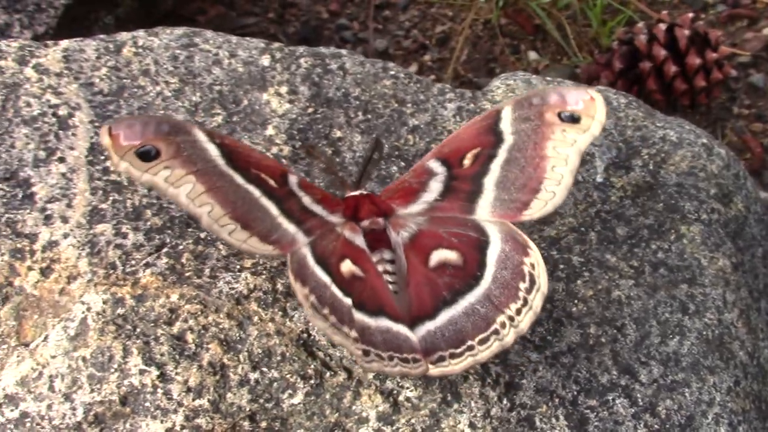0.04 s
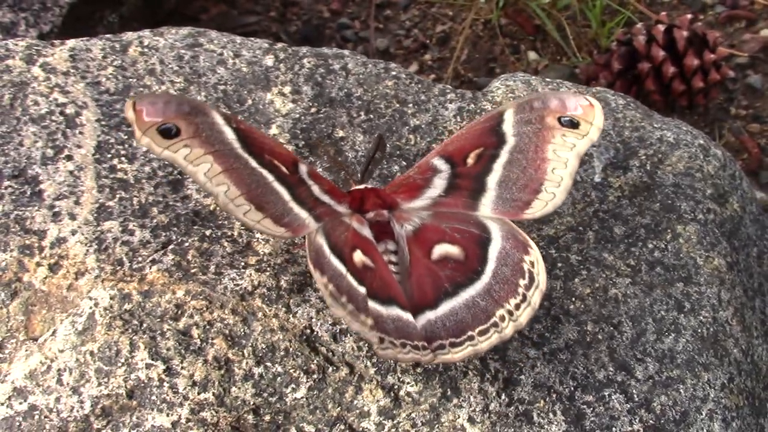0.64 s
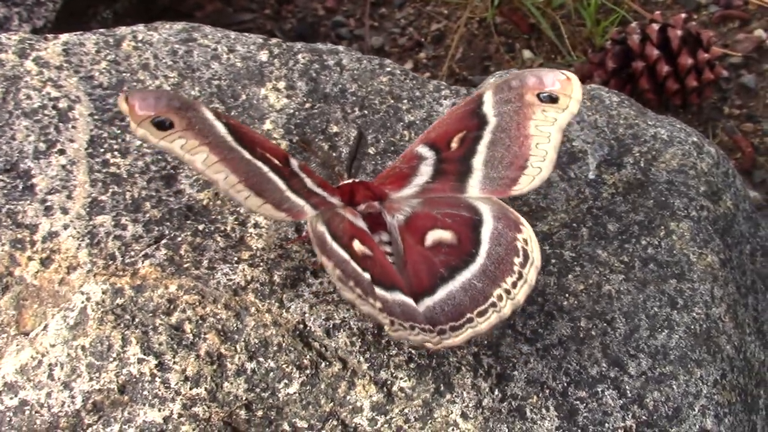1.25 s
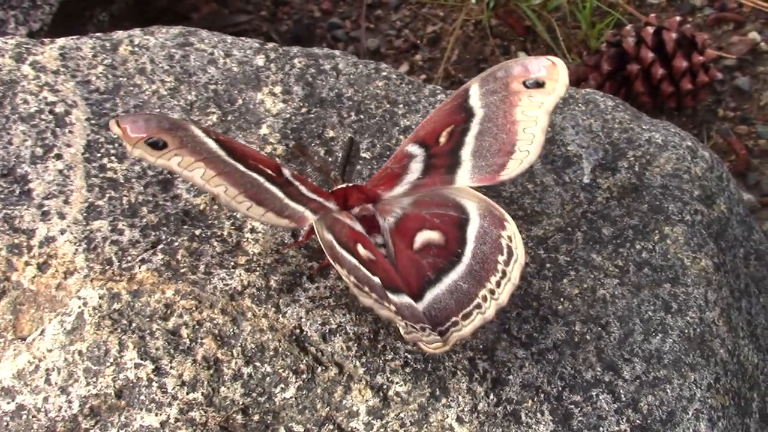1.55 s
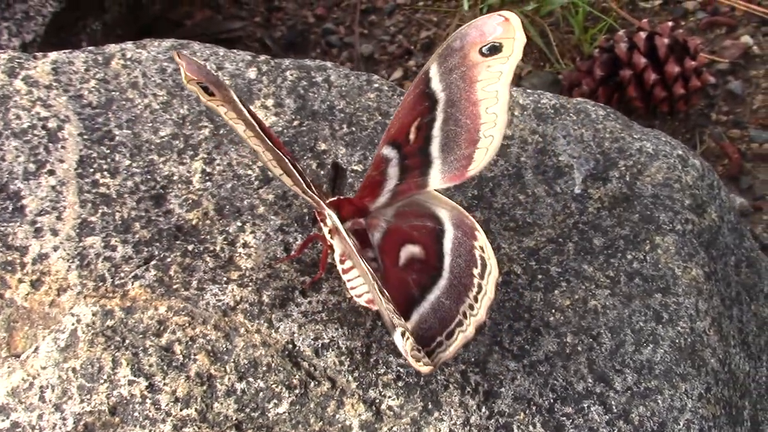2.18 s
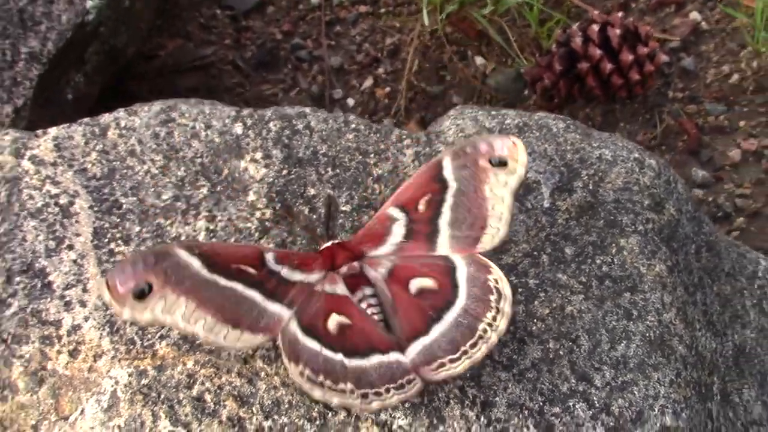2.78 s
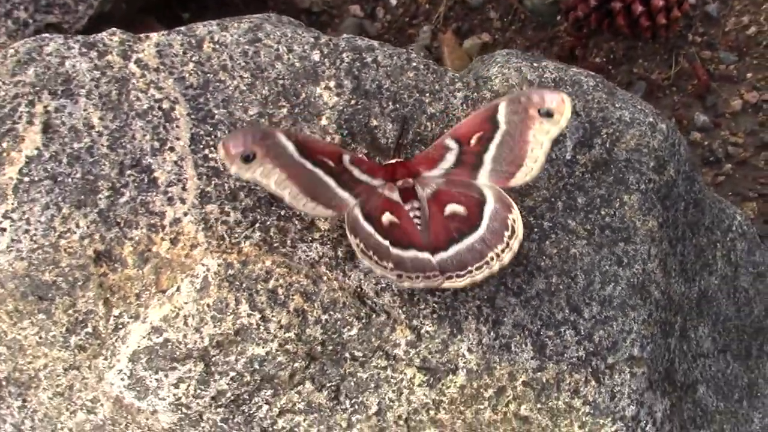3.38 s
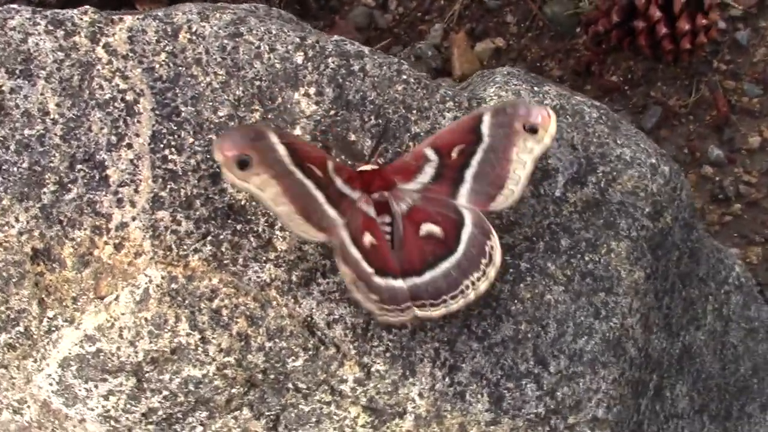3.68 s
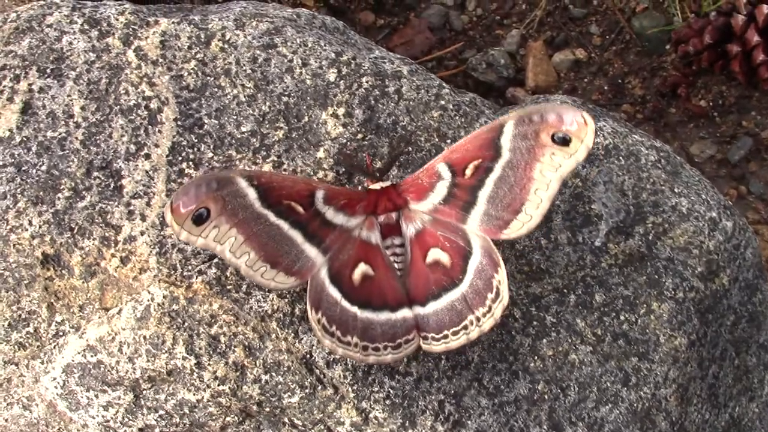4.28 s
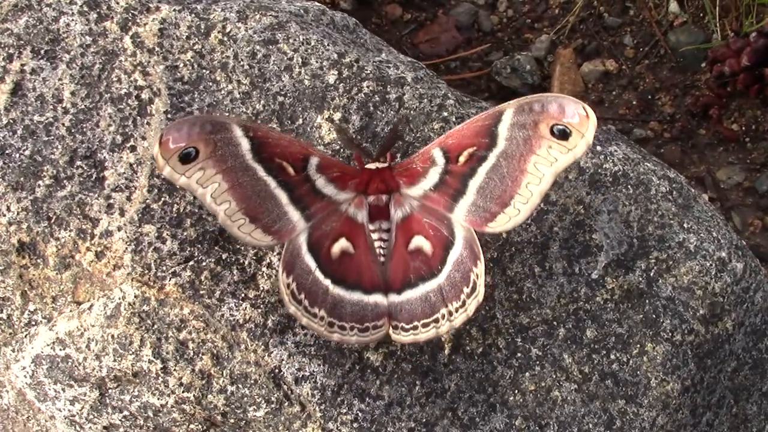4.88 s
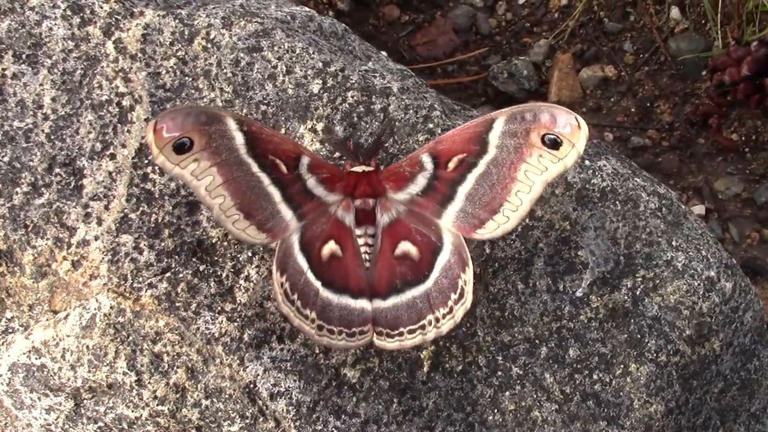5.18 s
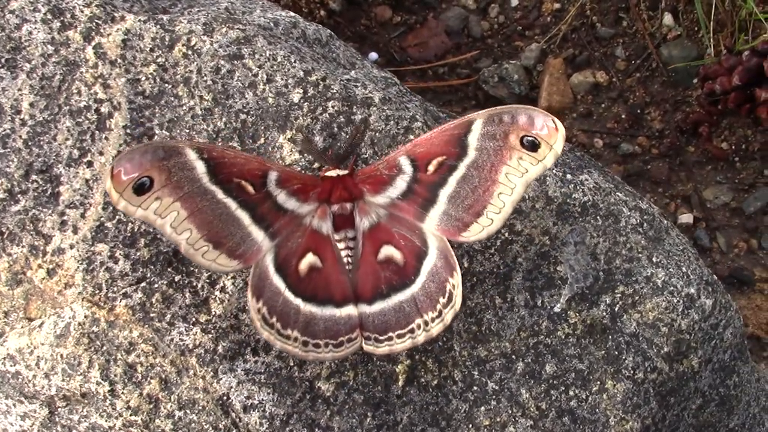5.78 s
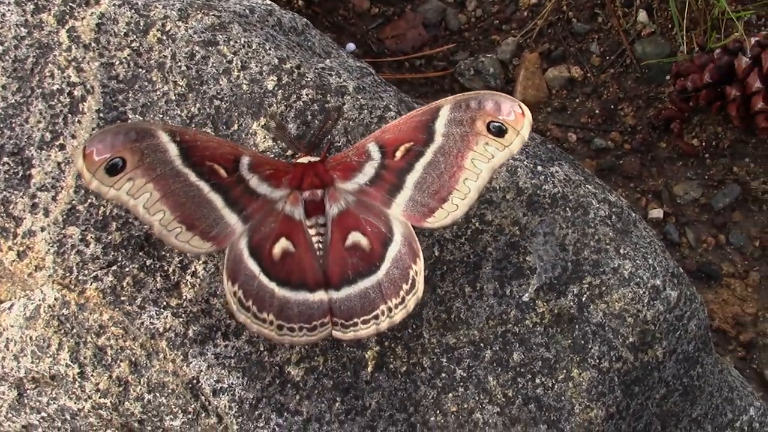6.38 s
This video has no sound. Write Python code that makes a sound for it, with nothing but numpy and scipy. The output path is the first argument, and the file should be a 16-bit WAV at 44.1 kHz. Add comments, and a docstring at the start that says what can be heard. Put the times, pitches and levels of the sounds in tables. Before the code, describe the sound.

A camera purrs and ticks in quiet open air, with close handling clicks and rubs, a sleeve rustle and faint distant bird notes.

```python
"""Quiet open air, and right at the stereo microphone the purr, hum and tick of a camera's drive.
The camera is hand-held over a silent moth on a rock; far off, a bird whistles a few faint notes.
As the camera is shifted, a sleeve rustles close by. Fingers click and thud on the case, ringing
and rocking it, and their skin rubs and creaks in tiny slips, right beside the microphone."""
import sys
import numpy as np
from scipy import signal
from scipy.fft import rfft, irfft
from scipy.io import wavfile

SR = 44100
rng = np.random.default_rng(int(sys.argv[2]) if len(sys.argv) > 2 else 0)


def dump(signal):
    """Clip the signal to [-1, 1] and save it as 16-bit WAV at the path in sys.argv[1]."""
    limited = np.clip(np.atleast_2d(signal).T, -1, 1)
    pcm = np.round(limited * 32767).astype(np.int16)
    wavfile.write(sys.argv[1], SR, pcm)


N = 293265
TIME = np.arange(N) / SR

# open air around the rock: (frequency [Hz], relative density [dB])
AIR_SPECTRUM = [(25, -32), (50, -22.5), (80, -13), (115, -4), (200, -8.5), (300, -5), (400, -8.5),
                (560, -10), (690, -15), (770, -17), (1230, -21.5), (2280, -25), (5000, -31.5),
                (11000, -39.5), (16000, -48)]
# how alike the two microphone channels are: (frequency [Hz], likeness [0-1])
MIC_LIKENESS = [(30, 0.6), (100, 1), (400, 0.89), (1500, 0.62), (5000, 0.84), (14000, 0.99)]
# purr of the drive: (frequency [Hz], relative density [dB])
PURR_SPECTRUM = [(40, -28), (80, -19), (115, -10), (220, 9), (320, -3), (450, -11.5), (550, -8),
                 (690, -7.5), (800, -20), (2500, -37)]
# hum of its motor: (multiple of the turning rate, rms level [dB])
HUM_PARTIALS = [(10, -56), (15, -60)]
# the case as the drive's bump rocks it: (frequency [Hz], level [dB], t60 [s])
ROCKING_MODES = [(130, -6, 0.036), (200, 2.5, 0.017)]
# how hard the drive bumps, swelling and easing: (time [s], level [dB])
BUMP_LEVELS = [(.45, -39), (.75, -33), (1.55, -37.5), (1.85, -32.5), (3.1, -37.5), (3.8, -33.5),
               (4.6, -33.5), (5.2, -36.5), (5.65, -47), (6.25, -33), (6.65, -38)]
# one cycle of the ticking mechanism: (time from the main tick [s], level [dB])
TICK_PATTERN = [(-.0052, -7.5), (.0004, 1), (.0044, -5.5)]
# ring of one tick: (frequency [Hz], level [dB], t60 [s])
TICK_RING = [(1660, -72.5, 0.058), (2044, -54.5, 0.017), (2330, -62.5, 0.012)]
# notes of the far bird: (middle time [s], top pitch [Hz])
BIRD_NOTES = [(1.723, 2350), (1.813, 2320), (1.967, 2420), (2.056, 2330), (2.305, 2370), (2.471, 2480),
              (2.56, 2360), (2.803, 2310)]
# rustling cloth: (frequency [Hz], relative density [dB])
SLEEVE_SPECTRUM = [(300, -25), (800, 2.5), (1700, 4), (3000, -1), (5800, -2.5), (9000, -9), (13000, -16),
                   (16000, -20)]
# a nail or an edge catches on the case:
# (time [s], crack level [dB], ring against crack [dB], crack cut-off [Hz], left over right [dB])
CASE_CLICKS = [(2.4474, -43.5, 1, 6000, 0), (2.5925, -42, 2, 8700, -0.5), (2.7152, -20, 3.5, 12200, 7),
               (2.7169, -16.5, 2.5, 6000, -2), (2.726, -25, -5, 8900, -6), (3.154, -33, -17, 6000, 2),
               (3.1796, -19, -20, 15800, -1), (3.218, -20, -30, 9200, -2), (3.2192, -16, -39, 11900, 1.5),
               (3.3480, -26.5, -20, 2000, -3), (3.5456, -33, -25, 8000, -1), (3.5717, -33.5, -12, 2940, -1),
               (3.703, -37, -25, 11800, 2), (3.9946, -36, -21, 2470, 1), (5.8320, -29, -15, 2900, 3)]
# the struck case: (frequency [Hz], level [dB], t60 [s])
CASE_RING = [(1350, -25, 0.015), (1870, -41, .014), (2240, 0.5, 0.013), (2890, -14, 0.019),
             (4070, -21, 0.027), (4931, -20, 0.0057)]
# twisting modes of the case: (frequency [Hz], level [dB], t60 [s])
CASE_TWIST = [(2220, -6, 0.016), (2870, -13, .012)]
# a fingertip presses on the case: (time [s], level [dB], left over right [dB])
FINGER_PRESSES = [(2.7247, -17, -13), (2.7446, -23, 1.5), (3.3497, -31, 4), (3.4702, -16, 0.5),
                  (3.4810, -26.5, -0.5), (3.501, -29.5, -1), (3.5163, -25, 0.5), (3.5660, -29.5, 0),
                  (4.1295, -35, -0.5), (5.8333, -29.5, 2)]
# first a brief rush of noise swelling into the loud click; in later rows a finger slides and lets go:
# (start [s], end [s], attack [s], final level [dB], growth [dB], chatter against friction [dB])
RUSH_AND_SLIDES = [(2.699, 2.711, .003, -40, 18, -7), (2.829, 3.039, 0.092, -46.5, 3.5, -17),
                   (3.114, 3.221, 0.0026, -36.5, 10, -8), (3.488, 3.595, 0.013, -51, -1, -8),
                   (3.686, 3.704, .003, -56.5, -6, -15)]
# skin sliding on the case: (frequency [Hz], relative density [dB])
FRICTION_SPECTRUM = [(150, -7), (350, -2), (650, -1.5), (1050, -8), (1500, -5), (2600, -7.5), (4500, -9),
                     (6500, -11.5), (8500, -23), (11000, -23), (16000, -52)]
# its bright grit under hard pressure: (frequency [Hz], relative density [dB])
GRIT_SPECTRUM = [(2000, -32), (5200, -8), (6300, 0), (7400, -1), (9000, 5), (11000, -12), (12500, -1),
                 (14500, -5), (16000, -2)]
# the grip sticks and slips: (start [s], length [s], level [dB], pitch [Hz])
GRIP_CREAKS = [(2.7416, 0.0027, -34, 1900), (2.747, .005, -37.5, 2140), (3.19, 0.0148, -32.5, 1557),
               (3.346, 0.0055, -38, 1904), (3.692, .014, -55.5, 4510), (5.829, 0.0061, -36.5, 2440),
               (6.073, 0.011, -45.5, 3620)]


def from_db(db):
    """Decibels to gain."""
    return 10 ** (np.asarray(db) / 20)


def rms_one(x):
    """Scale to unit power."""
    return x / np.sqrt(np.mean(x ** 2) + 1e-20)


def at_hz(points, hz):
    """Join the rows by straight lines on a log-frequency axis."""
    known_hz, values = np.transpose(points)
    return np.interp(np.log(hz + 1e-9), np.log(known_hz), values)


def colour(x, spectrum):
    """Give x a spectrum; rms 1."""
    gain = from_db(at_hz(spectrum, np.fft.rfftfreq(N, 1 / SR)))
    return rms_one(irfft(rfft(x) * gain, N))


def waver(hz):
    """Random drift, mostly slower than hz; rms 1."""
    return colour(rng.standard_normal(N), [(hz, 0), (10 * hz, -60), (100 * hz, -120)])


def stereo_noise(spectrum):
    """Noise as two close microphones hear it; rms 1."""
    mid, side = rfft(rng.standard_normal((2, N)))
    alike = at_hz(MIC_LIKENESS, np.fft.rfftfreq(N, 1 / SR))
    pair = np.sqrt(1 + alike) * mid + np.sqrt(1 - alike) * side * [[1], [-1]]
    return colour(irfft(pair, N), spectrum)


def cut(x, hz, kind, order=2):
    """Butterworth filter."""
    return signal.sosfilt(signal.butter(order, hz, kind, fs=SR, output="sos"), x)


def ring(modes, t):
    """Damped sines after one blow."""
    return sum(from_db(db - 60 * t / t60) * np.sin(2 * np.pi * hz * t) for hz, db, t60 in modes)


def add(out, s, sound, pan_db=0):
    """Mix a sound into both channels at time s."""
    start = int(np.clip(round(s * SR), 0, N))
    sides = from_db(np.array([[pan_db], [-pan_db]]) / 2)
    out[:, start:start + sound.shape[-1]] += rms_one(sides) * sound[..., :N - start]


def open_air(rms_db=-54):
    """A low, steady hush all around the microphone."""
    return from_db(rms_db) * stereo_noise(AIR_SPECTRUM)


def drive(turn_s=.08081, slowing_s_per_turn=1.34e-5, memory=0.86, purr_db=-58.7, waver_hz=4):
    """Each turn of the drive gives a bump and a rough purr; its motor hums on multiples of the turn."""
    out = np.zeros((2, N))
    count = np.arange(-1, TIME[-1] / turn_s + 1)
    bump_times = .0791 + turn_s * count + slowing_s_per_turn * count ** 2 / 2
    turns = np.interp(TIME, bump_times, count + 1)
    bump = -cut(ring(ROCKING_MODES, TIME[:SR // 10]), 520, "low")
    for s in bump_times[1:]:
        force_db = np.interp(s, *np.transpose(BUMP_LEVELS)) + rng.normal(0, .6)
        add(out, s, bump * from_db(force_db))
    # unevenness met on the way round, partly the same from turn to turn
    fresh = rng.standard_normal((len(count), 1024))
    track = signal.lfilter([1], [1, -memory], fresh, axis=0).ravel()
    track_turns = np.linspace(0, len(count), len(track), endpoint=False)
    purr = colour(np.interp(turns, track_turns, track), PURR_SPECTRUM)
    for multiple, db in HUM_PARTIALS:
        level = from_db(db + 2.5 * waver(waver_hz))
        cycles = multiple * turns + 0.15 * waver(waver_hz)
        out += level * np.sqrt(2) * np.sin(2 * np.pi * cycles)
    return out + from_db(purr_db) * purr


def ticking(first_s=.0425, rate_hz=14.985, jitter_s=0.00028, scatter_db=0.2):
    """A small mechanism inside the camera rings with three quick ticks each cycle."""
    out = np.zeros((2, N))
    tick = ring(TICK_RING, TIME[:SR // 20])
    for s in np.arange(first_s, TIME[-1], 1 / rate_hz):
        for delay, db in TICK_PATTERN:
            add(out, s + delay + rng.normal(0, jitter_s), tick * from_db(db + rng.normal(0, scatter_db)))
    return out


def far_bird(note_s=0.044, peak_db=-59, arch=0.052):
    """Thin whistled notes in the distance, each rising and falling a little."""
    out = np.zeros((2, N))
    position = np.linspace(-1, 1, int(note_s * SR))
    envelope = from_db(peak_db) * (1 - position ** 2)
    for middle, top_hz in BIRD_NOTES:
        phase = 2 * np.pi * np.cumsum(top_hz * (1 - arch * position ** 2)) / SR
        add(out, middle - note_s / 2, envelope * np.sin(phase))
    return out


def sleeve(start_s=1.963, stop_s=3.54, attack_s=.22, top_db=-54.5, rise_db_per_s=4, fall_db_per_s=21.5):
    """Cloth rustles near the microphone as the arm moves once, then settles."""
    onset = np.clip((TIME - start_s) / attack_s, 0, 1)
    below_db = np.maximum(rise_db_per_s * (stop_s - TIME), fall_db_per_s * (TIME - stop_s))
    return onset * from_db(top_db - below_db) * stereo_noise(SLEEVE_SPECTRUM)


def crack(top_hz, t60):
    """A dying burst of noise, duller for a softer contact; peak 1."""
    t = TIME[:SR // 10]
    burst = rng.standard_normal(len(t)) * from_db(-60 * t / t60)
    burst = cut(cut(burst, top_hz, "low", order=5), 180, "high")
    return burst / np.abs(burst).max()


def contacts(pat_db=-8, twist_per_db=0.1):
    """Soft pushes rock the camera with a thud and a pat of skin; sharp ones crack and ring its case."""
    out, t = np.zeros((2, N)), TIME[:SR // 10]
    thud = -ring([(235, 0, .012), (440, -5, .016), (850, -7, .007)], t)
    for s, db, pan_db in FINGER_PRESSES:
        pat = from_db(pat_db) * crack(top_hz=1850, t60=0.01)
        add(out, s, from_db(db) * (thud + pat), pan_db)
    # a small shell radiates little below its modes
    case, twist = (cut(ring(modes, t), 1430, "high") for modes in (CASE_RING, CASE_TWIST))
    for s, db, ring_db, top_hz, pan_db in CASE_CLICKS:
        add(out, s, from_db(db) * (crack(top_hz, t60=0.0062) + from_db(ring_db) * case), pan_db)
        # a touch off centre twists the case, moving the two microphones against each other
        add(out, s, twist_per_db * pan_db * from_db(db + ring_db) * twist * [[1], [-1]])
    return out


def chatter(slips, hz, width_hz):
    """The slips that fall in step around one pitch; rms 1."""
    return rms_one(cut(slips, [hz - width_hz / 2, hz + width_hz / 2], "band"))


def rush_and_slides(grain_db=3, snag_db=1.9, brush_db=-5, brush_t60=0.22):
    """A brief rush swells into the loud click; later, skin slips unevenly on plastic and brushes on."""
    out = np.zeros((2, N))
    slips = rng.standard_normal(N)
    slips *= from_db(grain_db * np.repeat(rng.standard_normal(N), 32)[:N])
    slips *= from_db(snag_db * waver(hz=70))   # the skin snags and runs free
    friction, grit = colour(slips, FRICTION_SPECTRUM), colour(slips, GRIT_SPECTRUM)
    judder = chatter(slips, hz=1800, width_hz=480)
    for start, end, attack_s, db, growth_db, chatter_db in RUSH_AND_SLIDES:
        part = slice(int(start * SR), int((end + brush_t60) * SR))
        t = TIME[part]
        swell_db = growth_db * (t - end) / (end - start)
        tail_db = brush_db - 60 * (t - end) / brush_t60
        onset = np.clip((t - start) / attack_s, 0, 1)
        level = onset * from_db(db + np.where(t < end, swell_db, tail_db))
        # grit grows faster than the level, so hard slides are brighter
        bright = from_db(9) * np.sqrt(level) * grit[part]
        add(out, start, level * (friction[part] + from_db(chatter_db) * judder[part] + bright))
    return out


def creaks(attack_s=.0032, jitter_hz=130, scuff_db=-15, creak_t60=.008, answer_db=-4, answer_t60=.057):
    """A quick run of nearly even slips sings at one pitch; the skin scuffs and the case answers."""
    out, t = np.zeros((2, N)), TIME[:SR // 10]
    scuff = from_db(scuff_db) * colour(rng.standard_normal(N), FRICTION_SPECTRUM)[:len(t)]
    for start, length, db, hz in GRIP_CREAKS:
        unevenness, slips = rng.standard_normal((2, len(t)))
        pitch_hz = hz + jitter_hz * rms_one(cut(unevenness, 500, "low"))
        tone = np.sqrt(2) * np.sin(2 * np.pi * np.cumsum(pitch_hz) / SR)
        after = np.maximum(t - length, 0)
        creak = (tone + scuff) * from_db(-60 * after / creak_t60)
        answer = chatter(slips, hz=2070, width_hz=830) * from_db(answer_db - 60 * after / answer_t60)
        add(out, start, from_db(db) * np.minimum(t / attack_s, 1) * (creak + answer))
    return out


def scene():
    """Open air, a far bird, a near sleeve, and drive and fingers right at the microphone."""
    air = open_air()
    camera = drive() + ticking() + contacts() + rush_and_slides() + creaks()
    # drive and finger sounds have their deep bass cut steeply
    low_cut = cut(camera, 123, "high", order=4)
    return air + far_bird() + sleeve() + low_cut


def record(dry):
    """The top treble is cut steeply."""
    cutoff_hz, edge_hz = 15900, 200
    hz = np.fft.rfftfreq(N, 1 / SR)
    return irfft(rfft(dry) * np.clip((cutoff_hz - hz) / edge_hz, 0, 1), N)


dry = scene()
out = record(dry)
dump(out)
```